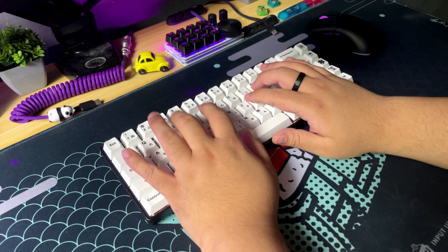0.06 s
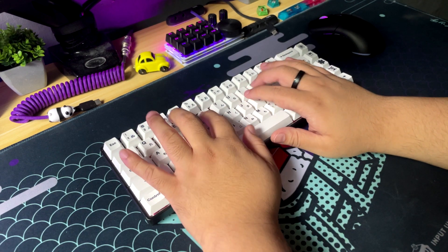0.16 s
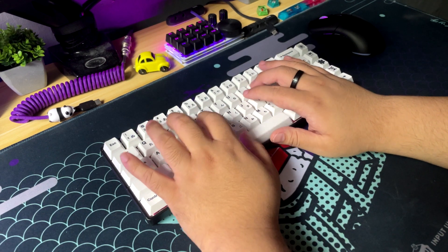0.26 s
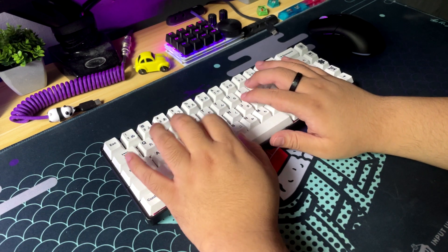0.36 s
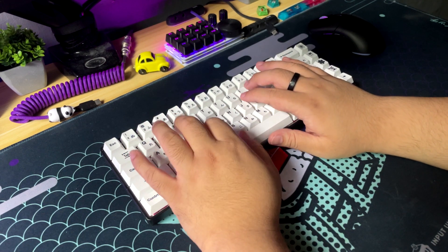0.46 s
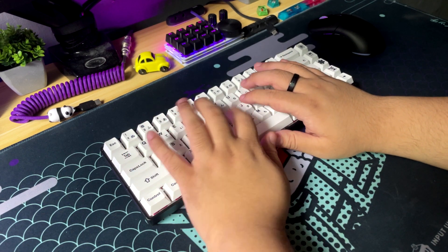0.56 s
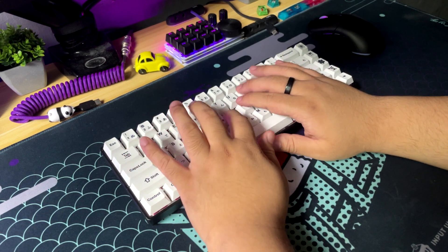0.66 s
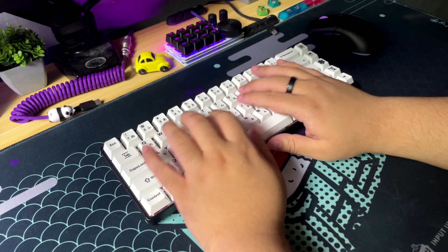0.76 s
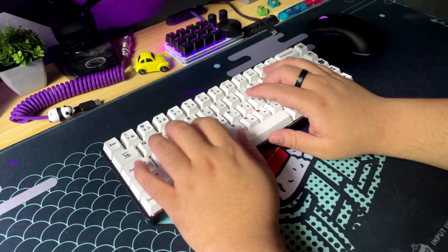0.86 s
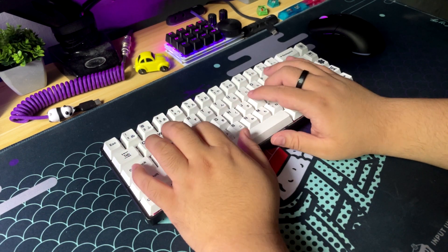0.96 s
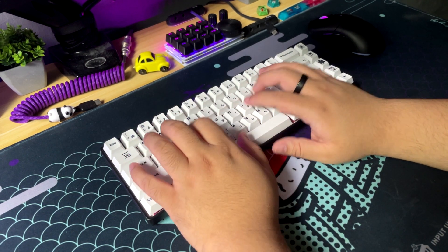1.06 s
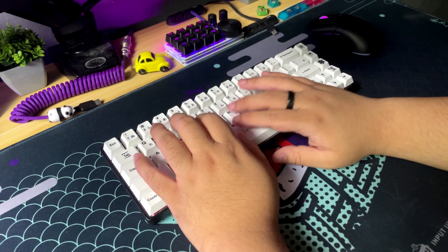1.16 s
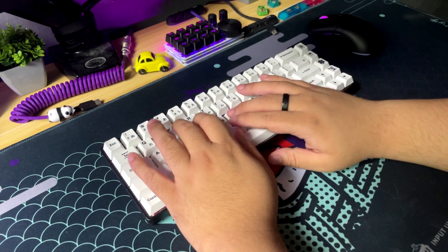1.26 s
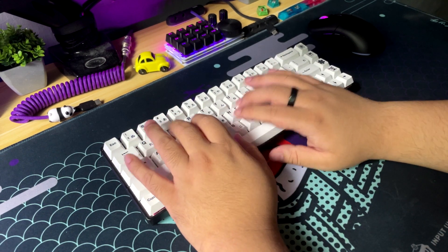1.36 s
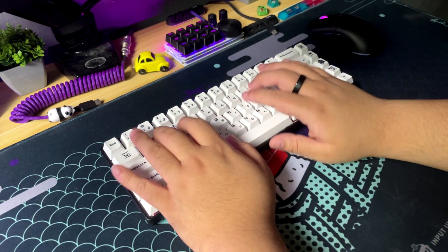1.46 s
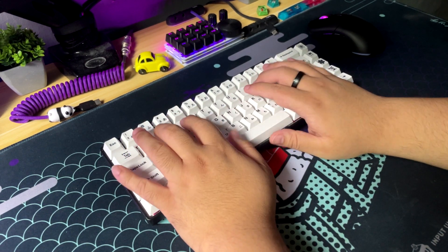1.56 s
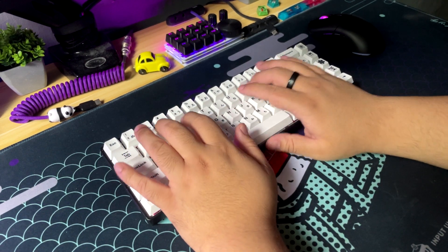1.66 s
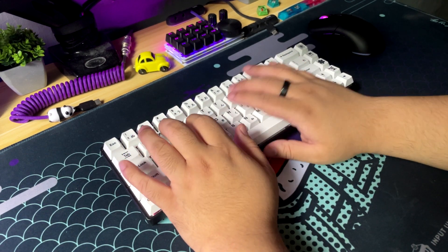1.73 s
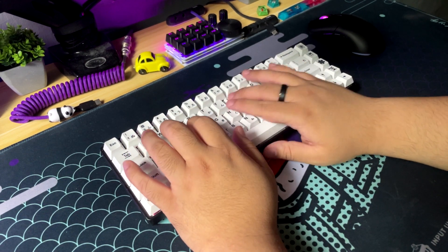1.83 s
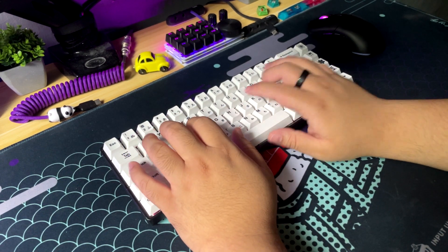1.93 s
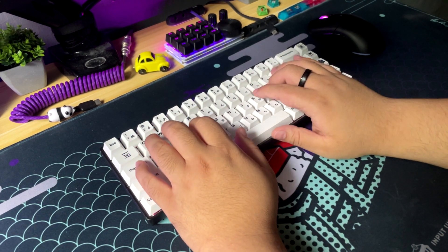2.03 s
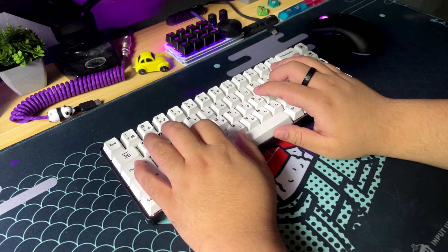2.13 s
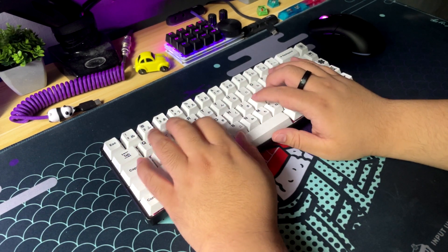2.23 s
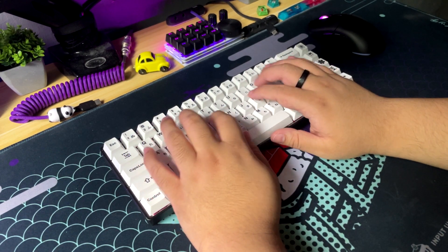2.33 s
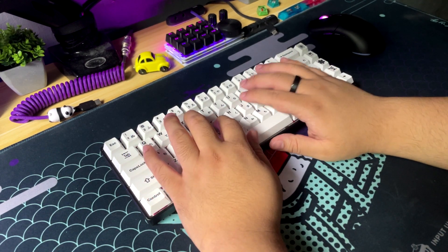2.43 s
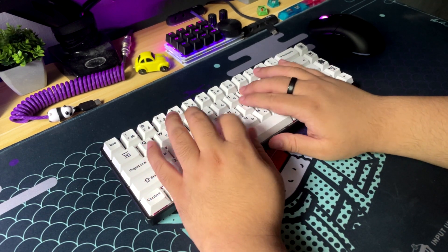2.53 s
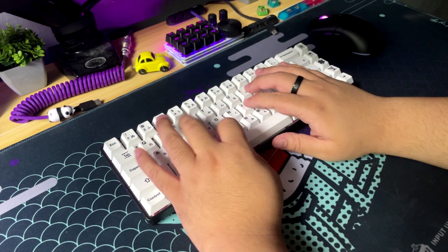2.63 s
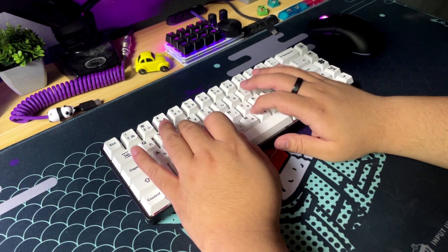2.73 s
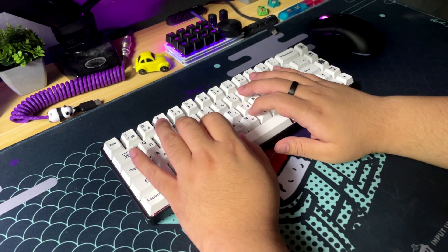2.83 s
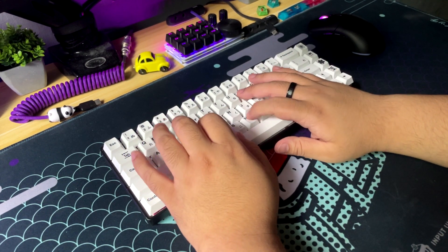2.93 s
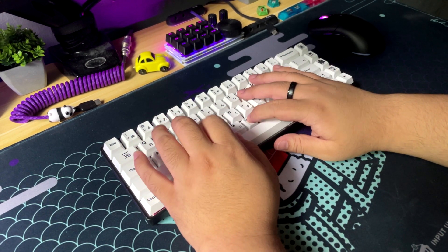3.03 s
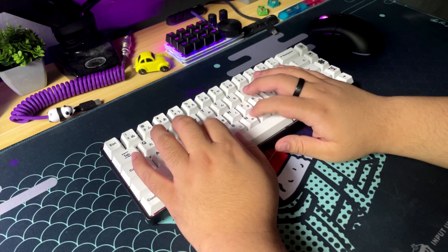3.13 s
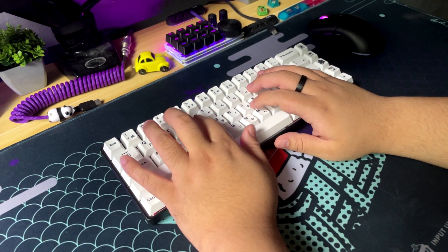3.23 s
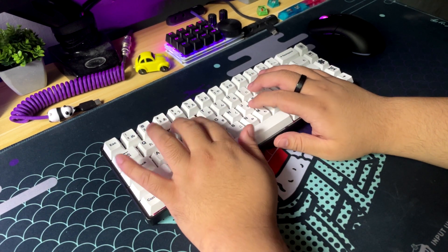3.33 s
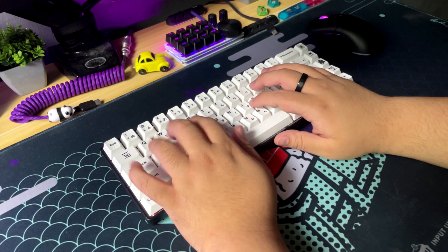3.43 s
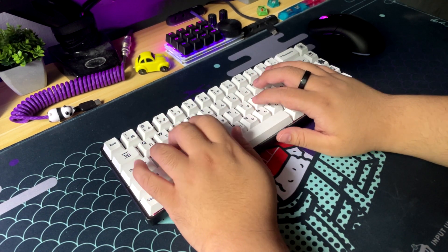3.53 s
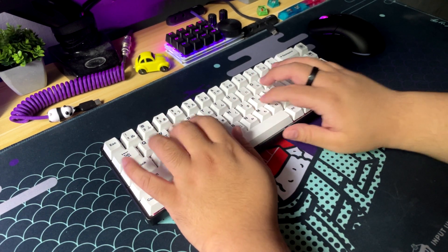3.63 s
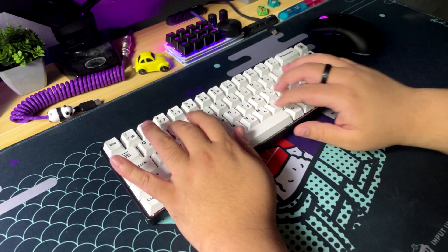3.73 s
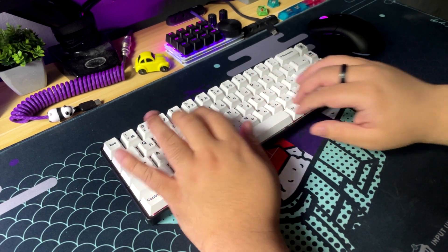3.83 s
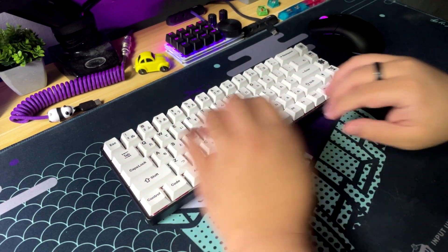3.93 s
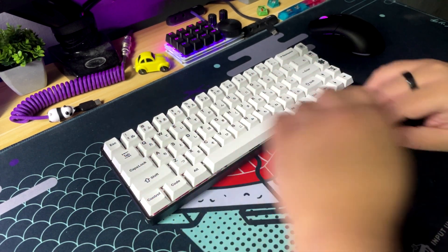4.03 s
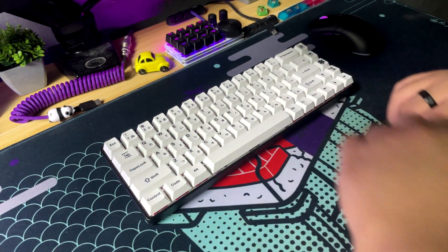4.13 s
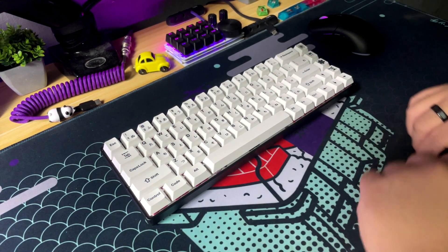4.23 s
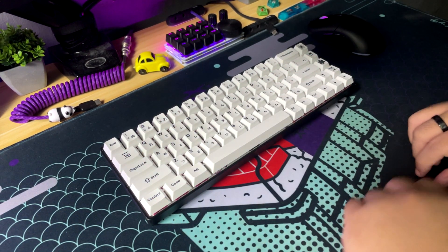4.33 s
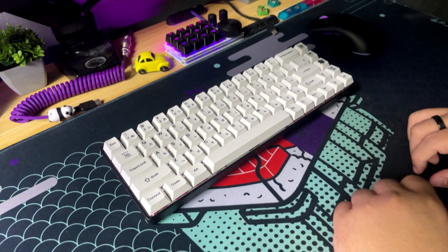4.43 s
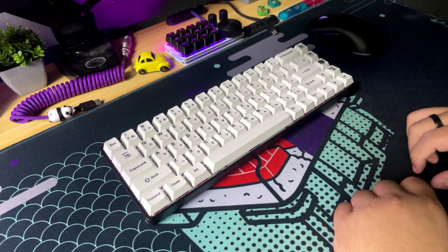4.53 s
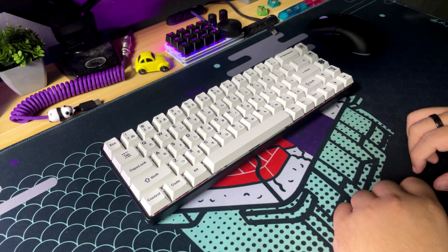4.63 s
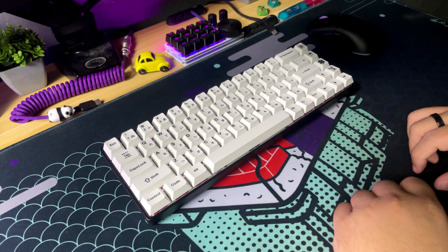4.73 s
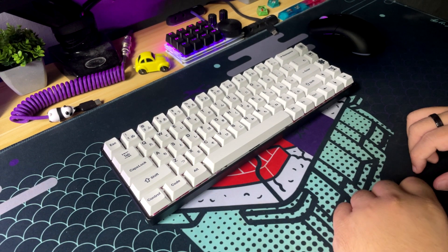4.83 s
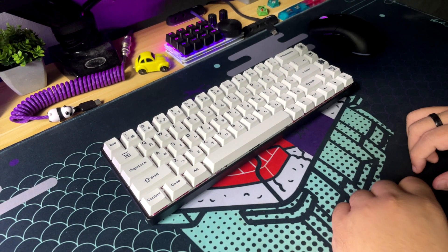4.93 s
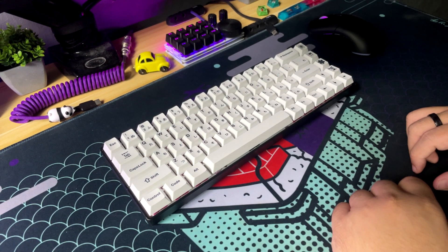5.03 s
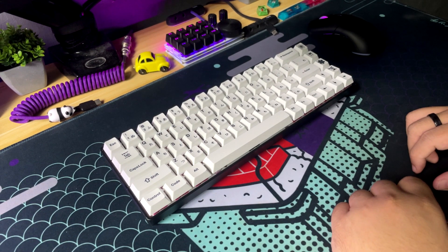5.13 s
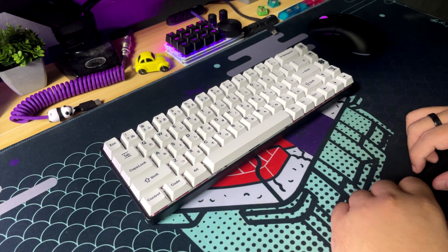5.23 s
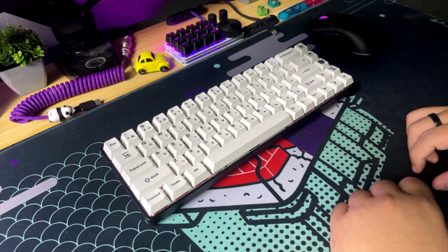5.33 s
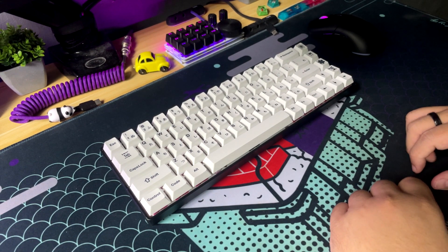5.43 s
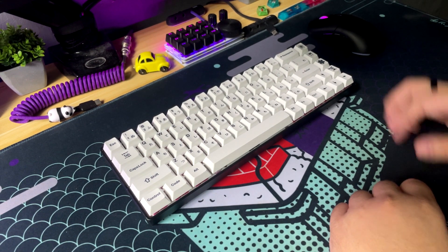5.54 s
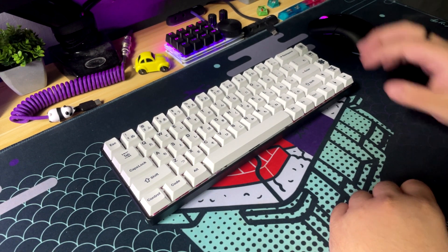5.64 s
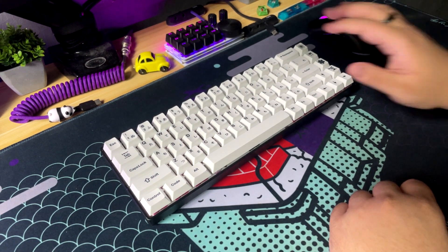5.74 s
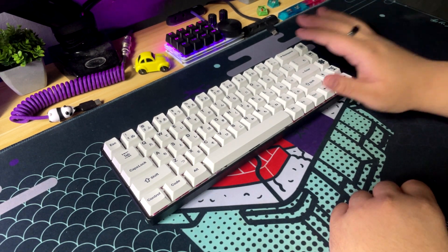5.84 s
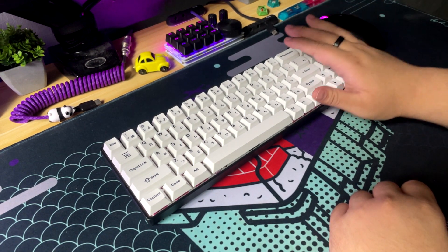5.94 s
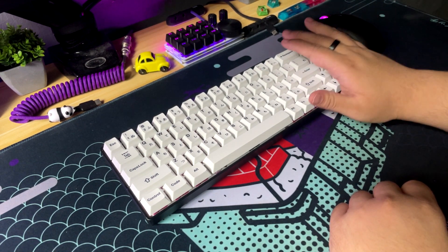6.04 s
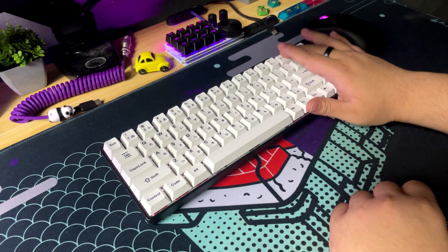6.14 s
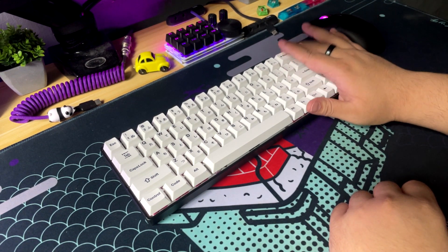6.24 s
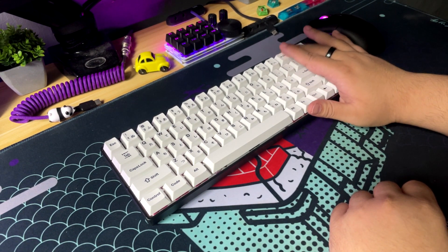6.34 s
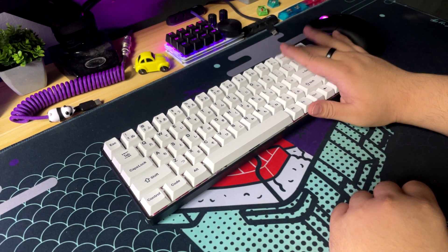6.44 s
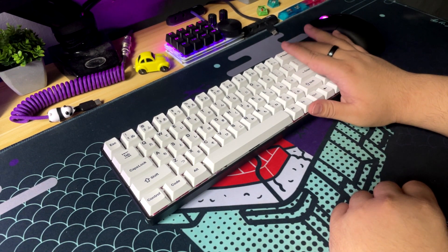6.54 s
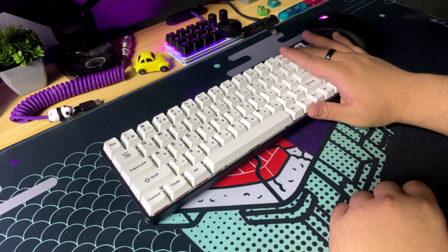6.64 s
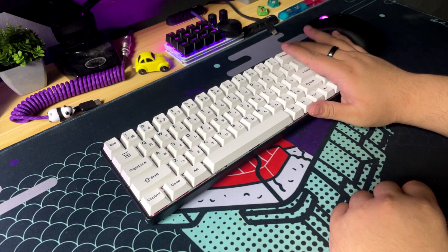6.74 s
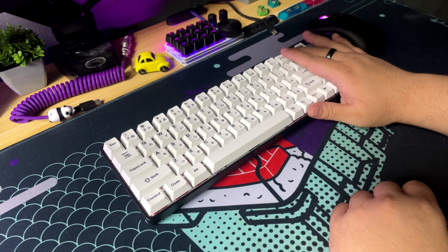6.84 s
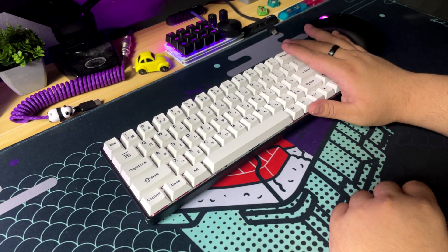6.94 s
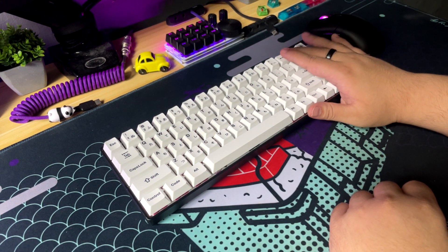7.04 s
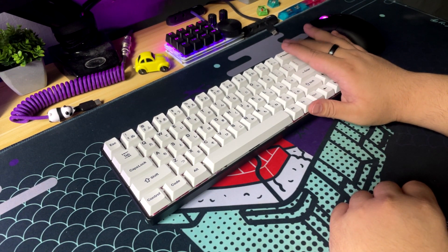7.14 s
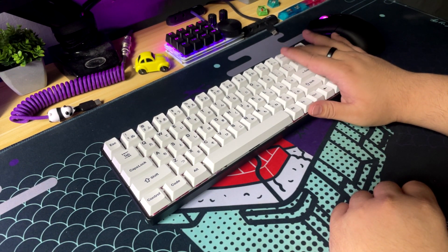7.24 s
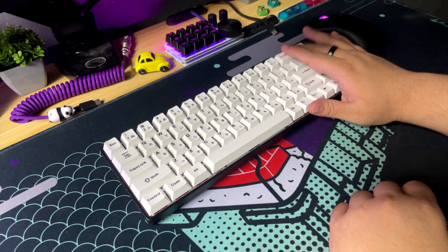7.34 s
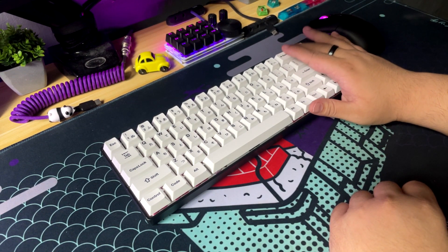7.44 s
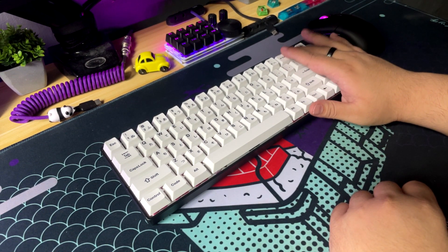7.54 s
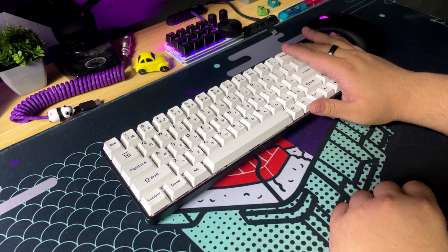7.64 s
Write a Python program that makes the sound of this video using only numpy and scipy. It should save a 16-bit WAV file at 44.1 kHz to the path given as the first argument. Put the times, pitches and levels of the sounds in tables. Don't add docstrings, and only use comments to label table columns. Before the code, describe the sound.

Close in a small, quiet room, a fast flurry of muted mechanical keystrokes of varying strength runs for almost four seconds, each lightly thumping the desk. The hands lift, cloth brushes, and a soft heavy thump with a tiny knock follows. Faint rustles and creaks fill the pause, then a single key clacks loudly and regularly, with a softer click at each release, until the end.

```python
import sys
import numpy as np
from scipy import signal
from scipy.fft import rfft, irfft, next_fast_len
from scipy.io import wavfile
from scipy.ndimage import uniform_filter1d

SR = 44100
rng = np.random.default_rng(int(sys.argv[2]) if len(sys.argv) > 2 else 0)


def amp(db):
    return 10 ** (np.asarray(db, float) / 20)


def write(x):
    x = np.atleast_2d(x).T
    wavfile.write(sys.argv[1], SR, np.round(np.clip(x, -1, 1) * 32767).astype(np.int16))


N = 339129

# frequency in Hz, level in dB per Hz.
LETTER_CRACK = [(290, -43), (500, 0.5), (2570, 9), (4030, 5.5), (7000, -23), (8830, -27), (10500, -32),
                (11300, -40), (12100, -39.5), (13800, -37), (16000, -59)]
# start in seconds, peak in dB, case pitch in Hz, brightness in dB,
# cap pitch in Hz.
DOWNS = [(0.066, -15, 1130, -1.5, 2150), (0.274, -14.5, 930, -3.5, 2440), (0.488, -15.5, 796, 10, 2490),
         (0.597, -11, 800, -4, 2610), (0.793, -12, 1127, -0.5, 2200), (0.863, -17.5, 780, 1, 2450),
         (1.112, -13, 716, -1.5, 2233), (1.176, -6.5, 720, -2.5, 2155), (1.286, -18.5, 780, -13.5, 2100),
         (1.365, -11, 740, -0.5, 2180), (1.481, -12.5, 1130, -3, 2112), (1.513, -18.5, 790, -4.5, 2450),
         (1.691, -14, 740, -11.5, 2320), (1.893, -10.5, 1180, -2.5, 2394), (1.995, -12, 847, -3.5, 2444),
         (2.3092, -11.5, 1130, 4, 2510), (2.374, -6.5, 746, 2, 2263), (2.582, -17, 730, -3.5, 2130),
         (2.808, -24.5, 714, -4.5, 2520), (2.868, -10, 732, -9, 2260), (3.049, -19, 957, -9, 2250),
         (3.229, -7.5, 800, -6, 1967), (3.337, -17, 750, -5.5, 2384), (3.359, -10.5, 764, 3.5, 1998),
         (3.441, -17.5, 690, 3.5, 2327), (3.511, -13.5, 720, -18, 1914), (3.547, -12, 780, -1.5, 2610),
         (3.62, -7.5, 763, -2, 2135)]
UPS = [(0.001, -24.5, 560, -2, 1800), (0.073, -25.5, 950, -19, 2160), (0.256, -19, 1270, -17.5, 2170),
       (0.377, -17.5, 930, -10, 2370), (0.591, -16, 676, -1.5, 2440), (0.684, -20.5, 1100, -3, 2660),
       (0.895, -25.5, 825, -8, 1960), (0.983, -18.5, 740, -8, 2060), (1.055, -21.5, 676, -11.5, 2180),
       (1.232, -22, 610, -15, 2100), (1.576, -26, 1160, -11, 2430), (1.773, -23, 1020, -14.5, 2060),
       (1.987, -22.5, 805, -10.5, 2230), (2.116, -22.5, 723, -15, 2140), (2.173, -28.5, 1200, -28, 2300),
       (2.402, -23, 1290, -9, 2170), (2.485, -26, 670, 8, 2450), (2.495, -35.5, 624, -7, 2130),
       (2.511, -21, 1120, -4, 2300), (2.521, -19, 1160, -5, 2460), (2.544, -24.5, 746, -3, 2340),
       (2.606, -20.5, 1180, -4, 2360), (2.72, -26, 695, -18, 1920), (2.959, -19.5, 1200, 1, 2660),
       (3.027, -23.5, 680, -13.5, 2190), (3.693, -20.5, 756, -7.5, 2420)]
# start in seconds, peak in dB, case pitch in Hz,
# brightness in dB, desk thump in dB.
SPACES = [
    (0.152, -17.5, 730, 4, -20),
    (0.944, -17, 600, 2.5, -20.5),
    (1.262, -19.5, 606, 7.5, -22.5),
    (2.058, -24.5, 575, 4.5, -28),
    (2.685, -22, 1290, 7.5, -17.5),
]
# start in seconds, peak in dB, time held in seconds, release peak in dB.
TAPS = [
    (5.969, -2, 0.098, -20),
    (6.164, -5, .084, -19.5),
    (6.346, -6.5, 0.078, -19),
    (6.527, -6, 0.086, -21),
    (6.706, -10, .08, -19),
    (6.89, -7.5, .084, -19.5),
    (7.076, -7.5, .085, -19),
    (7.256, -6.5, .083, -21),
    (7.442, -7.5, 0.089, -22.5),
]
# frequency in Hz, level in dB, t60 in seconds.
FRAME_MODES = [(39.2, -31.5, 0.23), (67.8, -3.5, 0.21), (102, -5.5, 0.086)]


def rms_one(x):
    return x / np.sqrt(np.mean(x ** 2) + 1e-20)


def at_hz(points, hz):
    table_hz, values = np.array(points)[:, 0], np.array(points)[:, 1]
    return np.interp(np.log(np.maximum(hz, 1)), np.log(table_hz), values)


def coloured(spectrum, size):
    hz = np.fft.rfftfreq(size, 1 / SR)
    return rms_one(irfft(rfft(rng.standard_normal(size)) * amp(at_hz(spectrum, hz)), size))


def band(x, low_hz, high_hz):
    return signal.sosfilt(signal.butter(2, [low_hz, high_hz], "band", fs=SR, output="sos"), x)


def cut(x, order, hz, kind):
    return signal.sosfilt(signal.butter(order, hz, kind, fs=SR, output="sos"), x)


def add(out, s, sound):
    i = int(round(s * SR))
    out[i:i + len(sound)] += sound[:N - i]


def slow(rate_hz):
    step = 64
    r = np.exp(-2 * np.pi * rate_hz * step / SR)
    walk = signal.lfilter([1], [1, -2 * r, r * r], rng.standard_normal(N // step + 502))[500:]
    return np.interp(np.arange(N) / step, np.arange(len(walk)), rms_one(walk))


def in_time(rows):
    s, db = np.transpose(rows)
    return amp(np.interp(np.arange(N) / SR, s, db, left=-130, right=-130))


def swell(times, levels_db, rise, fall):
    step = 32
    late = np.arange(0, N, step) / SR - times[:, None]
    gain = amp(levels_db[:, None] - np.maximum(-rise[:, None] * late, fall * late)).sum(axis=0)
    return np.repeat(gain, step)[:N]


def struck(modes, t, gains_db, widen):
    hz, width, db = np.transpose(modes)
    width = width * widen * (hz / 2000) ** 0.049
    start = amp(db + gains_db) * width / 200
    decay = np.exp(-np.pi * width[:, None] * t)
    return start @ (decay * np.sin(2 * np.pi * hz[:, None] * t))


def snap(db):
    cepstrum = irfft(db * np.log(10) / 20)
    cepstrum[1:len(db) - 1] *= 2
    cepstrum[len(db):] = 0
    return irfft(np.exp(rfft(cepstrum)))


def mixed(rows, mix, cap_hz=None):
    case_db, cap_db, spring_db = mix
    contacts = []
    for s, peak_db, pitch_hz, bright, *more in rows:
        contacts.append((s, peak_db, pitch_hz, case_db, cap_db + bright, spring_db + 1.6 * bright,
                         cap_hz or more[0]))
    return contacts


def keys(contacts, modes, crack, widen, case_width_hz, case_db, cap_width_hz, cap_db, snap_db, crack_db,
         crack_s, spread_db, echo_s, echo_db, slide_db, same, low_hz, high_hz):
    (out, around), t = np.zeros((2, N)), np.arange(2048) / SR
    hz, fine_hz, lag = np.array(modes)[:, 0], np.fft.rfftfreq(2048, 1 / SR), int(echo_s * SR)
    for s, peak_db, pitch, case, cap, spring, cap_hz in contacts:
        softness = np.clip(-peak_db / 25, 0, 1.3)
        case = case + 5.5 * softness
        colour = [(900, case + 16), (2000, 0), (4200, cap + 17), (10000, spring + 33)]

        drift = 0.05 * np.minimum(1, 3500 / hz) * (1 - same) * rng.standard_normal(len(hz))
        detuned = np.array(modes, float)
        detuned[:, 0] *= 1 + drift
        hit = struck(detuned, t, at_hz(colour, hz) + spread_db * rng.standard_normal(len(hz)), widen)
        own = [(pitch, case_width_hz, case_db + case + 17), (cap_hz, cap_width_hz, cap_db)]
        hit = hit + struck(own, t, 0, 0.54)

        fresh = coloured(crack, size=2048)
        burst = irfft(rfft(fresh) * amp(at_hz(colour, fine_hz)), 2048)
        hit = hit + amp(crack_db) * burst * np.exp(-t / (crack_s * (1 + 0.68 * softness)))
        onset_s = 0.00024 + 0.00045 * softness
        hit = hit * np.sin(np.pi / 2 * np.minimum(t / onset_s, 1)) ** 2
        pulse = snap(at_hz(crack, fine_hz) + at_hz(colour, fine_hz))
        hit = hit + amp(snap_db) * pulse / np.abs(pulse).max()

        hit[lag:] += amp(echo_db) * hit[:-lag]
        for wait in (rng.uniform(0.001, 0.0056, size=2) * SR).astype(int):
            hit[wait:] += amp(-31.0 + 17.0 * softness) * hit[:-wait]

        top_db = min(0, 4.5 + 0.8 * (spring + 33) - 15 * softness)
        hit = irfft(rfft(hit) * amp(at_hz([(11300, 0), (12500, top_db)], fine_hz)))
        hit = -amp(peak_db) * hit / np.abs(hit).max()
        add(out, s + 0.001, hit)

        power = uniform_filter1d(np.abs(rfft(hit)) ** 2, size=21)
        even = snap(10 * np.log10(power + 1e-16))
        scatter = amp(-12 - 60 * t / 0.074) * rng.standard_normal(2048) * (t > 0.003) / 16
        add(out, s + 0.001, signal.fftconvolve(even, scatter))
        add(around, s + 0.001, even)

        slide = fresh[::-1][:600] * np.hanning(900)[:600]
        add(out, max(s - 600 / SR, 0), amp(slide_db + 1.4 * peak_db) * slide)
    return cut(cut([out, around], 6, low_hz, "high"), 4, high_hz, "low")


def pushes(table, panel, frame, rise_s):
    out, t = np.zeros(N), np.arange(10240) / SR
    for s, panel_db, frame_db in table:
        for modes, level_db in ((panel, panel_db - 2.0), (frame, panel_db + frame_db + 11.0)):
            hz, db, t60 = np.transpose(modes)[:, :, None]
            strength = amp(level_db + db + 1.8 * rng.standard_normal(hz.shape))
            hz = hz * (1 + 0.02 * rng.standard_normal(hz.shape))
            rings = strength * amp(-60 * t / t60) * np.sin(2 * np.pi * hz * t)
            add(out, s, rings.sum(axis=0) * (1 - np.exp(-t / rise_s)))
    return out


def ticks(rows):
    out, t = np.zeros(N), np.arange(2048) / SR
    for s, peak_db, modes, rise_s in rows:
        hit = struck(modes, t, rng.normal(0, 3, len(modes)), 1.0) * (1 - np.exp(-t / rise_s)) ** 2
        add(out, s, amp(peak_db) * hit / np.abs(hit).max())
    return out


def air():
    # frequency in Hz, level in dB per Hz.
    air_spectrum = [(35, -38), (60, -12.5), (91, -20.5), (133, 2.5), (239, -35), (396, -2.5), (683, -11),
                    (975, -8.5), (1680, -14.5), (1870, -15.5), (2300, -31), (9000, -50.5), (11700, -88),
                    (19800, -120)]
    base = coloured(air_spectrum, size=next_fast_len(N))[:N]
    edges = 40 * 2 ** np.arange(0, 8.6, 0.5)
    bands = [band(base, a, b) * amp(1.6 * slow(9)) for a, b in zip(edges, edges[1:])]
    return amp(-71) * rms_one(sum(bands))


def hands():
    # time in seconds, level in dB.
    wrist_weight = [(0.0, -48), (0.8, -60.5), (1.09, -52.5), (1.37, -47.5), (1.7, -56), (2.44, -55.5),
                    (2.76, -47.5), (3.23, -55.5), (3.82, -48.5), (3.95, -63), (4.17, -66), (4.37, -55.5),
                    (4.6, -69.5), (4.95, -76), (5.74, -71), (6.17, -52), (6.65, -52.5), (7.69, -54.5)]
    # time in seconds, sleeve murmur in dB, skin rustle in dB,
    # rise in dB per second.
    shifts = [
        (3.76, -53.5, -75, 296),
        (3.88, -59, -78, 400),
        (4.256, -51.5, -66, 2501),
        (4.329, -62, -77, 405),
        (4.531, -85, -99, 299),
        (4.77, -63.5, -99, 200),
        (5.266, -63, -86, 1502),
        (5.355, -70.5, -78, 1500),
        (5.41, -61.5, -65, 347.5),
        (5.921, -57, -90, 200),
    ]
    # frequency in Hz, level in dB.
    skin_bands = [(1500, 3), (2300, 8), (2900, 6.5), (3600, 4), (4500, 0), (5400, -6), (6300, -9.5),
                  (7800, -16.5)]
    rumble, t = in_time(wrist_weight), np.arange(N) / SR
    s, murmur_db, rustle_db, rise = np.transpose(shifts)
    aloft = uniform_filter1d(((t > 3.76) & (t < 4.7)) * 1.0, size=2000)
    sway = amp(1.5 - 13 * aloft) * rumble ** 1.247
    murmur = swell(s, murmur_db, rise, 117)
    rustle = swell(s, rustle_db, rise, 228)
    white = rng.standard_normal((4, N))
    out = sway * rms_one(band(band(white[0], 31, 85), 32, 200))
    out = out + rumble * rms_one(band(band(white[1], 77, 240), 75, 830))
    sleeve = rms_one(band(band(white[2], 240, 400), 280, 714))
    out = out + murmur * amp(-4 + 4.3 * slow(11.0)) * sleeve
    skin = sum(amp(db + 4.0 * slow(30)) * band(white[3], hz, 1.146 * hz) for hz, db in skin_bands)
    return out + rustle * rms_one(skin)


def fingers():
    # time in seconds, level in dB.
    glides = [
        (0.0, -49),
        (0.4, -64),
        (1.2, -56.5),
        (1.76, -62),
        (2.3, -73),
        (2.5, -56.5),
        (3.0, -65),
        (3.55, -53.5),
        (3.8, -73.5),
    ]
    glide = in_time(glides)
    white = rng.standard_normal((2, N))
    whisper = 0.25 * band(white[1], 5500, 13000) + 1.77 * band(white[1], 10000, 11200)
    rub = glide * rms_one(band(white[0], 970, 3600))
    spring = amp(-39) * glide * amp(4.0 * slow(7)) * rms_one(whisper)
    return amp(-9.5 + 3.87 * slow(40)) * (rub + spring)


def letter_keys():
    # frequency in Hz, width in Hz, level in dB.
    letter_modes = [(1100, 130, -8), (1450, 25, -5), (2610, 68, -6), (2840, 55, -15.5), (3370, 180, -8.5),
                    (5230, 50, -13.5), (6300, 350, -37), (6465, 27, -28), (7400, 30, -30.5),
                    (7800, 75, -33), (8300, 110, -38), (9400, 25, -35.5), (9450, 60, -35.5),
                    (10190, 170, -37.5), (12480, 84, -47.5), (13940, 130, -40.5)]
    wobbles = [
        (0.2532, -25, 590, -11.5, 2200),
        (1.2645, -26, 655, 5, 2400),
        (2.6828, -24, 800, -1.5, 2300),
        (2.688, -32, 726, -9, 2350),
        (2.8065, -20.5, 940, -9.5, 2120),
        (2.8105, -21, 680, -4, 2600),
        (1.0575, -31.5, 680, -10.5, 2200),
        (1.098, -37.5, 800, -6, 2300),
        (1.461, -40.5, 800, 0.5, 2500),
    ]
    # start in seconds, peak in dB, case pitch in Hz,
    # brightness in dB.
    touches = [(0.135, -34, 532, 4.5), (0.84, -41, 1140, 14), (1.352, -33.5, 900, -1),
               (1.405, -35, 633, -32), (1.8815, -27, 1360, 0.5), (2.656, -30, 926, 5),
               (3.134, -32.5, 1129, 11), (3.29, -33.5, 1070, -10), (0.567, -40.5, 800, -5.5),
               (0.779, -34, 770, -7), (1.672, -37.5, 925, -26.5), (2.564, -36, 798, 1),
               (2.939, -40, 800, -3.5), (3.01, -44.5, 800, -14.5), (3.15, -38, 984, 8)]
    typed = mixed(DOWNS, (-13, -15.5, -26)) + mixed(UPS + wobbles, (-12.5, -18, -27.5))
    typed += mixed(touches, (-14.5, -21.5, -32), cap_hz=2300)
    return keys(typed, letter_modes, LETTER_CRACK, widen=4.8, case_width_hz=180, case_db=2.0,
                cap_width_hz=580, cap_db=5.5, snap_db=7.5, crack_db=-0.5, crack_s=0.0019, spread_db=5.5,
                echo_s=0.0022, echo_db=-24.5, slide_db=-43.5, same=0.0994, low_hz=401.6, high_hz=11400)


def springs():
    # start in seconds, ping peak in dB, topmost air in dB.
    pings = [(0.0662, -41, -84), (0.1526, -49.5, -51), (0.2748, -42, -76), (0.377, -53.5, -90),
             (0.4886, -36.5, -39), (0.5866, -39.5, -52), (0.597, -32.5, -49), (0.684, -58.5, -81),
             (0.7787, -53.5, -58), (0.7938, -32.5, -48), (0.8634, -45, -77), (0.9443, -44.5, -60),
             (0.9837, -40.5, -78), (1.113, -50.5, -53), (1.1126, -32, -41), (1.1754, -31, -66),
             (1.262, -47, -57), (1.286, -45.5, -71), (1.3648, -48, -63), (1.365, -33, -60),
             (1.482, -51.5, -86), (1.482, -40.5, -80), (1.5154, -37, -79), (1.6911, -42.5, -66),
             (1.8816, -56, -51), (1.8931, -32.5, -46), (1.9954, -56, -76), (1.9954, -45, -81),
             (2.057, -64, -73), (2.1161, -57, -88.5), (2.3098, -38, -51), (2.369, -56.5, -48),
             (2.3742, -32.5, -46), (2.4845, -43, -70), (2.5636, -47, -86), (2.5825, -39.5, -73),
             (2.607, -48.5, -75), (2.684, -46.5, -65), (2.8105, -46, -68), (2.8694, -42.5, -63),
             (2.9595, -57.5, -90), (3.0505, -54, -82), (3.1343, -55, -86), (3.1513, -46.5, -93),
             (3.2291, -31.5, -67), (3.3383, -49.5, -58), (3.3605, -42.5, -58), (3.441, -41.5, -61),
             (3.512, -53.5, -64), (3.5468, -38, -64), (3.6198, -27.5, -62), (3.6943, -45.5, -88)]
    ping_hz, air_hz = (10010, 10960), (11800, 15300)
    (ping, top), t = np.zeros((2, N)) + 1e-18, np.arange(1024) / SR
    for s, ping_db, air_db in pings:
        puff = rng.standard_normal(1024) * np.exp(-t / 0.001) * np.minimum(t / 0.00043, 1)
        ping_rms = np.sqrt(np.mean(band(puff, *ping_hz)[:128] ** 2))
        add(ping, s, amp(ping_db - 7.83) * puff / ping_rms)
        add(top, s, amp(air_db + 5) * puff)
    return band(band(ping, *ping_hz), 8500, 12000) + band(band(top, *air_hz), *air_hz)


def desk():
    # frequency in Hz, level in dB, t60 in seconds.
    panel_modes = [(134.4, -2.5, 0.22), (181, 0.5, 0.2), (205, -6, 0.12), (248, -14.5, 0.074),
                   (445.6, -4.5, 0.17)]
    space_panel = [(177, -0.5, 0.15), (265.5, -15, 0.12), (440, -10, 0.07), (580, -15, 0.05),
                   (330, -19, 0.1)]
    corner_panel = [(118.5, -8.5, 0.074), (202.5, 6.5, 0.064), (260.5, -3, 0.13), (414, -4.5, 0.081)]
    # start in seconds, peak in dB.
    leans = [(0.151, -35.5), (0.267, -31), (0.489, -34), (0.576, -39), (0.865, -38), (0.944, -30.5),
             (1.128, -39), (1.261, -34.5), (1.362, -47), (1.462, -45), (1.899, -39), (2.059, -38.5),
             (2.292, -67), (2.412, -39), (2.513, -40.5), (2.684, -35.5), (2.828, -37.5), (3.162, -43.5),
             (3.263, -39), (3.364, -44), (3.453, -32), (3.623, -42)]
    # start in s, panel in dB, frame against panel in dB
    rows = [(row[0], row[1] - 34, -9.5) for row in DOWNS]
    rows += [(row[0], row[1] - 25, -15) for row in UPS]
    rows += [(s, db - 17.5, 14) for s, db in leans]
    bar = [(row[0], row[4], -28) for row in SPACES]
    taps = [(s, db - 28.5, -9.5) for s, db, _, _ in TAPS]
    taps += [(s + held, db - 22, -17) for s, _, held, db in TAPS]
    out = pushes(rows, panel_modes, FRAME_MODES, rise_s=0.0075)
    out = out + pushes(bar, space_panel, FRAME_MODES, rise_s=0.0032)
    out = out + pushes(taps, corner_panel, FRAME_MODES, rise_s=0.0049)
    return cut(out, 4, 52, "high")


def space_bar():
    # frequency in Hz, width in Hz, level in dB.
    bar_modes = [(1270, 97, -5.5), (3420, 82, -14), (4936, 110, 0.5), (5430, 46, -9.5), (5660, 76, -17.5),
                 (6570, 98, -25), (7480, 300, -18.5), (8640, 340, -23.5), (10100, 160, -34.5),
                 (11650, 360, -36.5), (13500, 500, -37)]
    return keys(mixed(SPACES, (-11, -27, -21), cap_hz=2480), bar_modes, LETTER_CRACK, widen=2.5,
                case_width_hz=86, case_db=1.0, cap_width_hz=630, cap_db=6.5, snap_db=5.5, crack_db=-3.0,
                crack_s=0.0023, spread_db=5.0, echo_s=0.0012, echo_db=-11.5, slide_db=-27.0, same=0.5,
                low_hz=298.5, high_hz=14000)


def tail(walls):
    t = np.arange(SR // 2) / SR
    white = rng.standard_normal((2, len(t)))
    out = 0
    for k, (hz, t60, db) in enumerate(walls):
        part = band(white[k % 2], hz / np.sqrt(2), min(hz * np.sqrt(2), 16000))
        out = out + part * amp(db - 60 * t / t60) * (1 - np.exp(-t / 0.0078)) / 16
    return out


def room(x, walls):
    turn = 2 * np.pi * 4.1 * np.arange(N) / SR
    return sum(signal.oaconvolve(x * share, tail(walls))[:N] for share in (np.cos(turn), np.sin(turn)))


def creaks():
    # start in seconds, peak in dB, pitch in Hz.
    slips = [
        (3.911, -60.5, 903),
        (4.007, -60.5, 1450),
        (4.05, -59.5, 1413),
        (4.796, -60, 968),
        (5.263, -56.5, 422),
        (5.362, -56, 422),
        (5.42, -59.5, 580),
        (5.525, -70, 1725),
        (5.558, -60, 476),
    ]
    return ticks([(s, db, [(hz, 35, 0)], 0.006) for s, db, hz in slips])


def hand_drop():
    # start in seconds, panel in dB, frame against panel in dB.
    drops = [
        (4.214, -37, -36),
        (4.245, -29, -20),
        (4.289, -29, -22),
        (4.349, -55, 5),
        (5.735, -52, -17.5),
        (5.859, -52, -9),
    ]
    # frequency in Hz, level in dB, t60 in seconds.
    drop_panel = [(122, 7, 0.099), (141.5, 3.5, 0.19), (152, 1, 0.17), (282.7, -14.5, 0.56),
                  (430, -19.5, 0.14)]
    drop_frame = [(27.8, 1, 0.33), (38, -8.5, 0.3), (55, -9, 0.32)]
    return pushes(drops, drop_panel, drop_frame, rise_s=0.013)


def knuckle():
    # start in seconds, peak in dB.
    knocks = [
        (4.2453, -31),
        (4.251, -48),
        (4.256, -32),
        (4.2633, -35),
    ]
    # frequency in Hz, width in Hz, level in dB.
    knuckle_modes = [(1375, 200, 8.5), (1730, 340, 11.5), (800, 300, -2), (3590, 810, -24)]
    return ticks([(s, db, knuckle_modes, 0.0022) for s, db in knocks])


def corner_touch():
    cap_modes = [(5450, 70, 0), (900, 60, -3)]   # (Hz, width Hz, dB)
    return ticks([(s - 0.011, db - 46, cap_modes, 0.0006) for s, db, _, _ in TAPS])


def corner_key():
    # frequency in Hz, width in Hz, level in dB.
    press_modes = [(740, 54, -11.5), (923, 99, 2.5), (1171, 29, 0), (1630, 73, -5.5), (2250, 130, -5),
                   (2723, 150, -8), (3060, 166, -6), (3474, 300, -7), (4120, 640, -10), (4570, 130, -19.5),
                   (5150, 130, -14), (6690, 63, -24.5), (8620, 540, -26.5), (9560, 370, -29.5),
                   (10340, 100, -36.5), (12180, 300, -48), (15460, 250, -52), (13900, 190, -43.5)]
    release_modes = [(720, 27, -1), (950, 29.5, 0.5), (1420, 25, -26), (2200, 110, -1.5), (2910, 84, -15),
                     (4430, 540, 2), (4300, 80, -25), (5320, 39, -6), (6140, 110, -29), (8400, 92, -37),
                     (9800, 150, -31), (13400, 100, -47)]
    # frequency in Hz, level in dB per Hz.
    corner_crack = [(450, -38.5), (720, 15.5), (1700, 8), (3200, -0.5), (5500, -2.5), (6500, -42),
                    (7200, -36.5), (8800, -26.5), (11800, -40.5), (14000, -42), (16000, -52.5)]
    case_hz = 860
    down = [(s, db, case_hz, -17, -17, -31 + (db + 7.5), 1993) for s, db, _, _ in TAPS]
    up = [(s + held, db, case_hz, -11.5, -21.5, -36, 2070) for s, _, held, db in TAPS]
    presses = keys(down, press_modes, corner_crack, widen=1.37, case_width_hz=390, case_db=-12.0,
                   cap_width_hz=180, cap_db=1.5, snap_db=7.0, crack_db=-4.0, crack_s=0.0012,
                   spread_db=1.2, echo_s=0.002452, echo_db=-9.0, slide_db=-40.0, same=0.8,
                   low_hz=719, high_hz=13960)
    releases = keys(up, release_modes, corner_crack, widen=2.53, case_width_hz=370, case_db=-18.0,
                    cap_width_hz=390, cap_db=5.5, snap_db=-2.0, crack_db=-7.0, crack_s=0.0026,
                    spread_db=1.2, echo_s=0.0018, echo_db=-12.0, slide_db=-58.0, same=0.8,
                    low_hz=690, high_hz=12000)
    return presses + releases


def scene():
    # frequency in Hz, t60 in seconds, level in dB.
    room_walls = [(298, 0.77, -24.5), (560, 0.69, -20.5), (1200, 0.63, -21.5), (2450, 0.26, -23.5),
                  (4885, 0.47, -29), (9810, 0.31, -20.5), (15180, 0.16, -19)]
    corner_walls = [(298, 0.66, -27.5), (560, 1, -24), (1200, 0.6, -25.5), (2450, 0.34, -21.5),
                    (4800, 0.32, -31.5), (9800, 0.32, -21.5), (15060, 0.25, -21.5)]
    background = air() + hands() + fingers()
    small = springs() + creaks() + knuckle() + corner_touch()
    near, around = letter_keys() + space_bar() + small
    corner, behind = corner_key()
    echoes = room(around, room_walls) + room(behind, corner_walls)
    return (near + corner + echoes + desk() + hand_drop() + background)[None]


def top_cut(x):
    return signal.sosfilt(signal.butter(12, 16430, fs=SR, output="sos"), x)


def record(dry):
    headroom = 1.7
    rounded = headroom * np.tanh(dry / headroom)
    return top_cut(cut(rounded, 4, 15300, "low"))


dry = scene()
out = record(dry)
write(out)
```